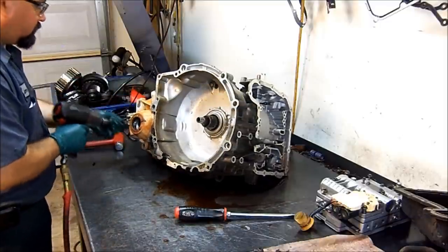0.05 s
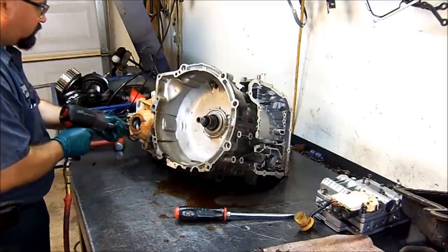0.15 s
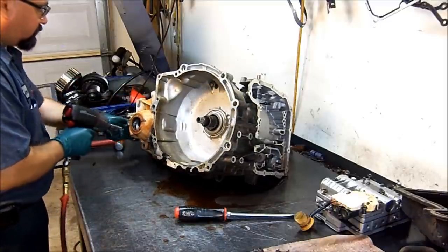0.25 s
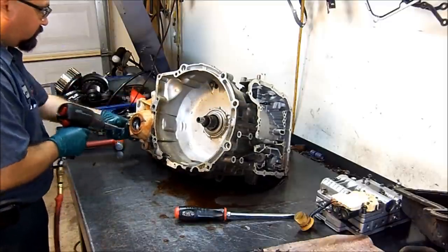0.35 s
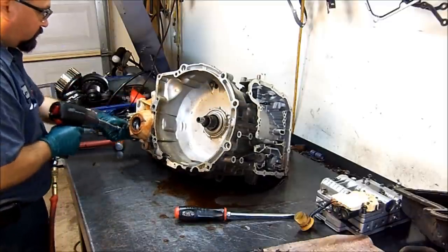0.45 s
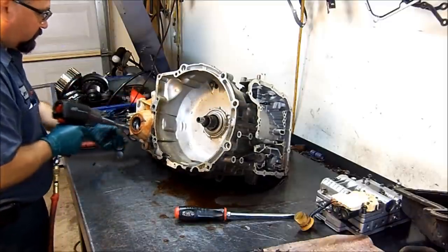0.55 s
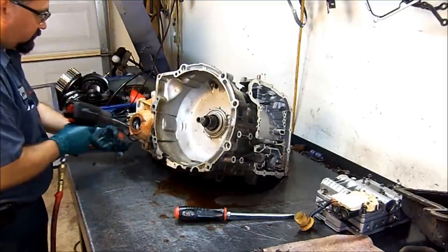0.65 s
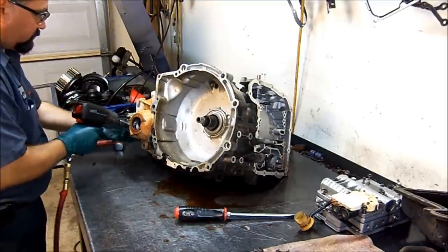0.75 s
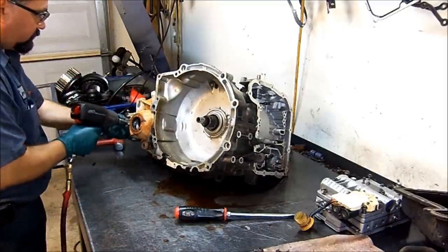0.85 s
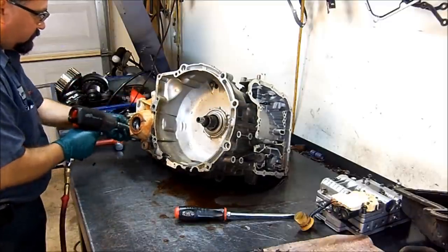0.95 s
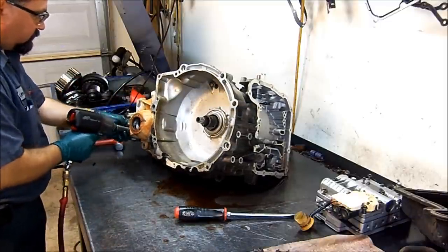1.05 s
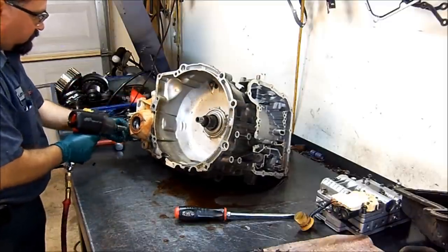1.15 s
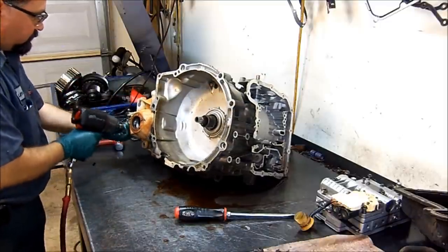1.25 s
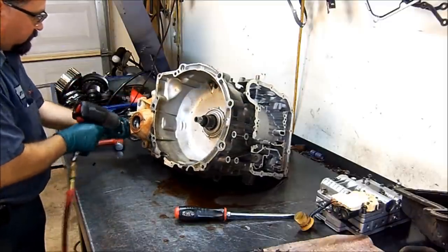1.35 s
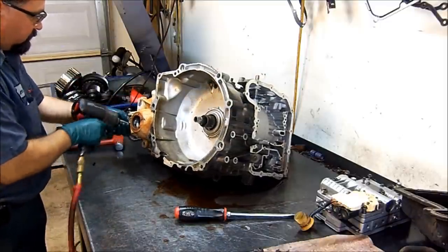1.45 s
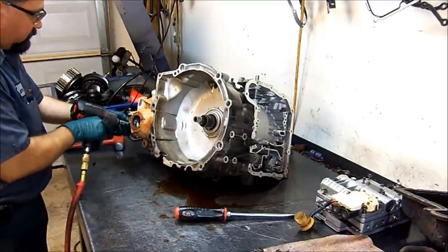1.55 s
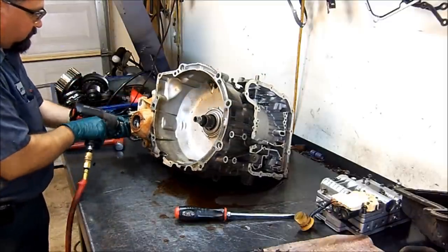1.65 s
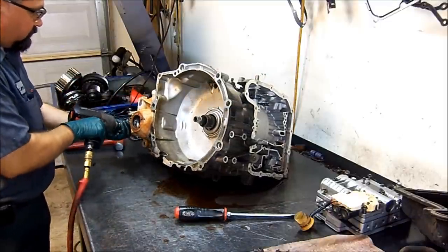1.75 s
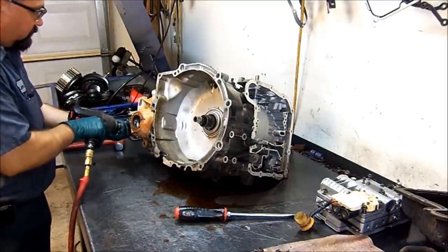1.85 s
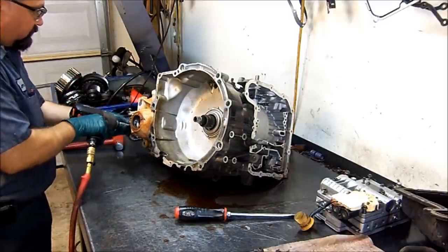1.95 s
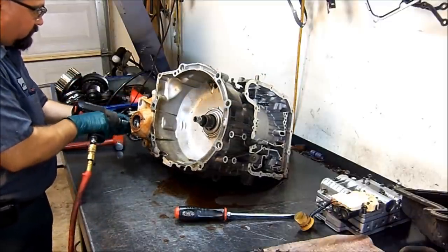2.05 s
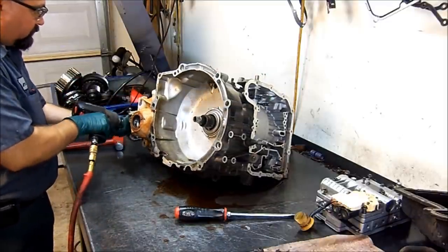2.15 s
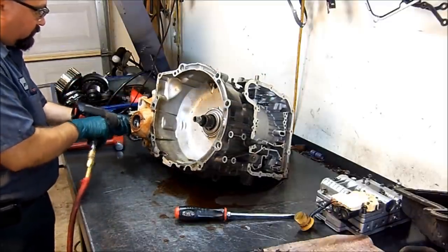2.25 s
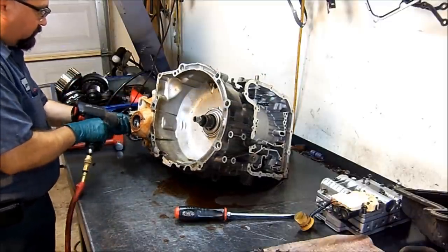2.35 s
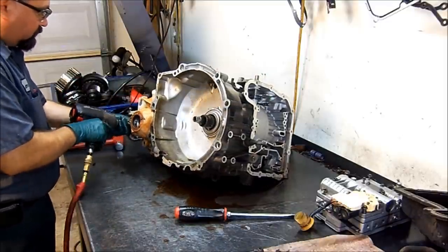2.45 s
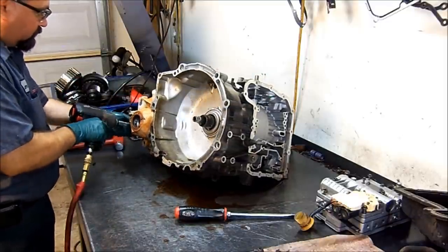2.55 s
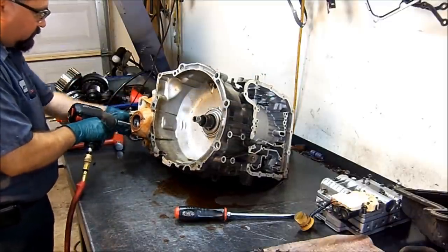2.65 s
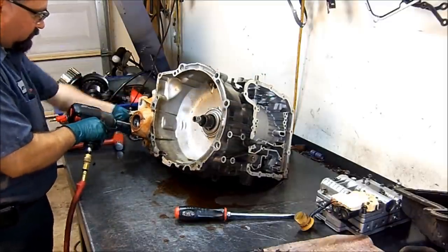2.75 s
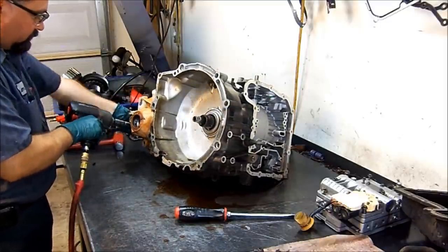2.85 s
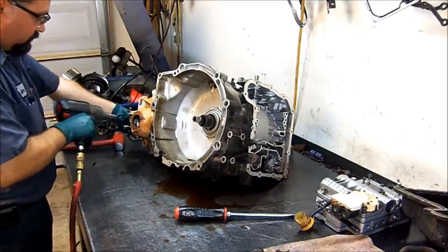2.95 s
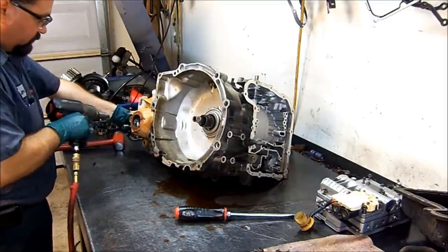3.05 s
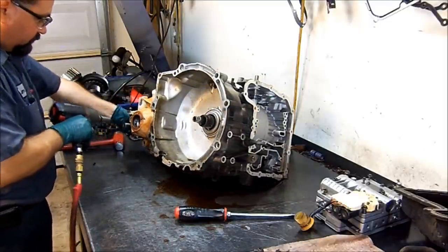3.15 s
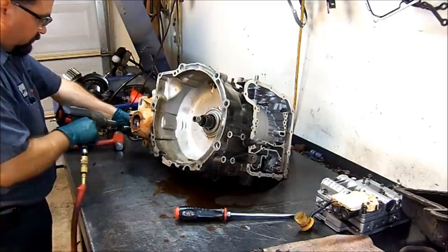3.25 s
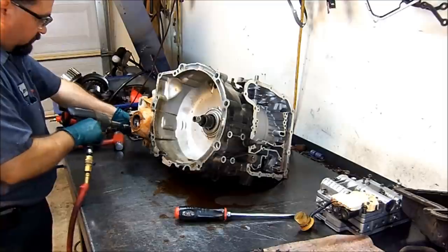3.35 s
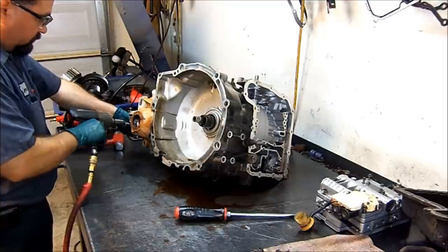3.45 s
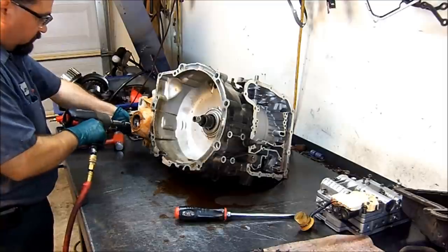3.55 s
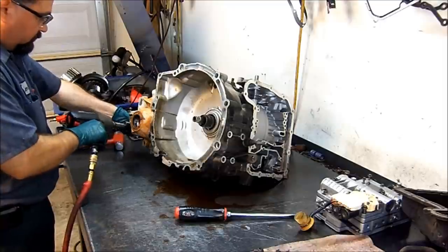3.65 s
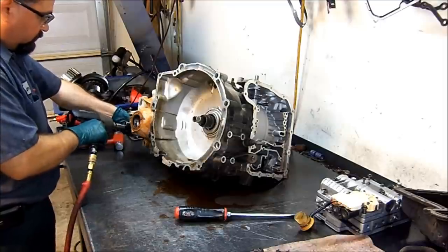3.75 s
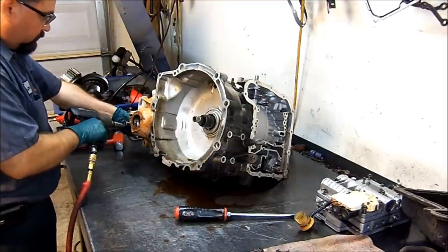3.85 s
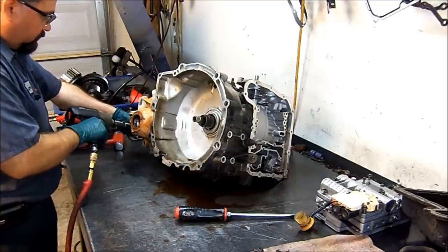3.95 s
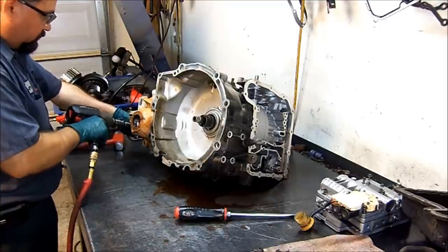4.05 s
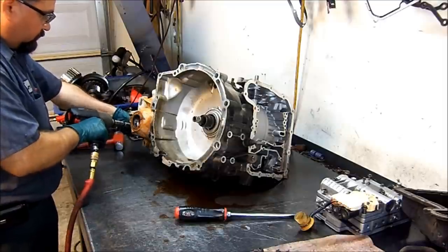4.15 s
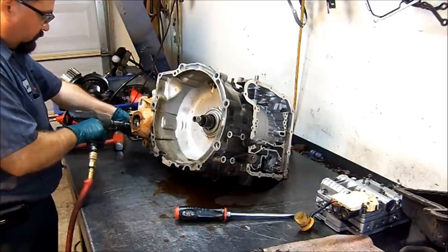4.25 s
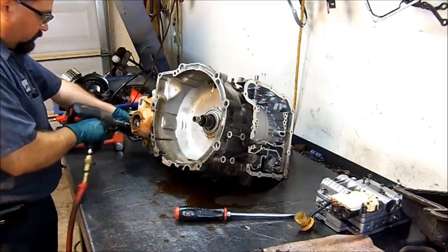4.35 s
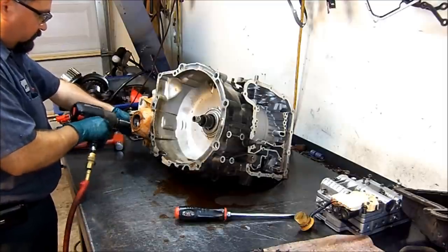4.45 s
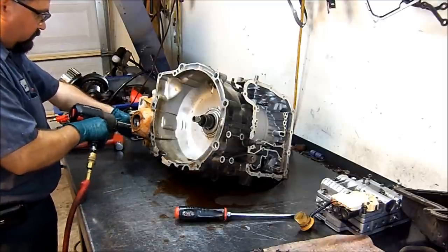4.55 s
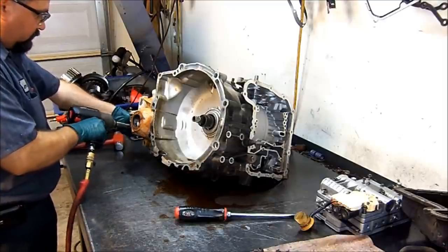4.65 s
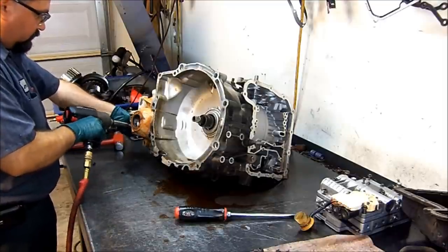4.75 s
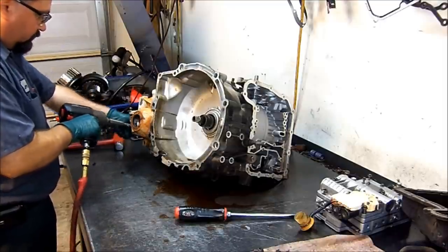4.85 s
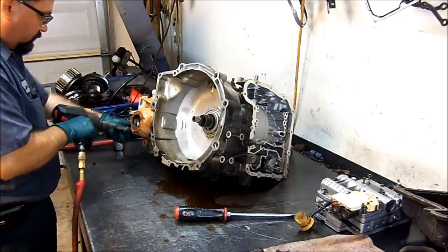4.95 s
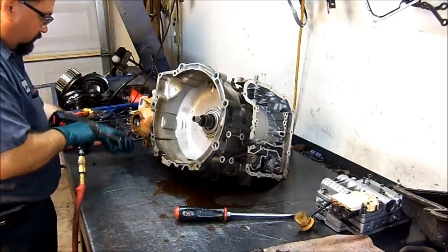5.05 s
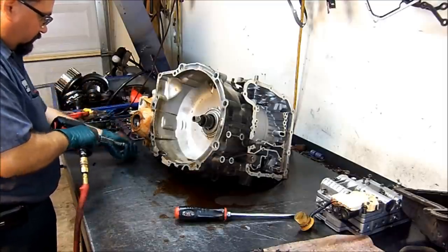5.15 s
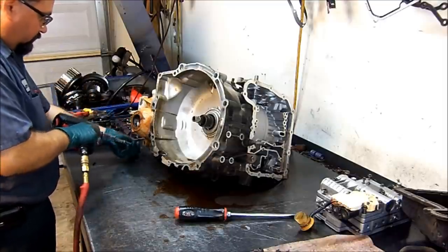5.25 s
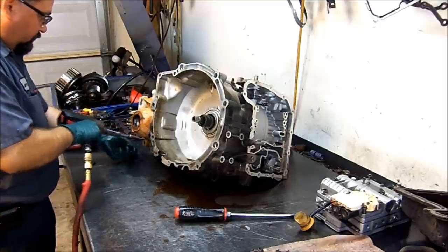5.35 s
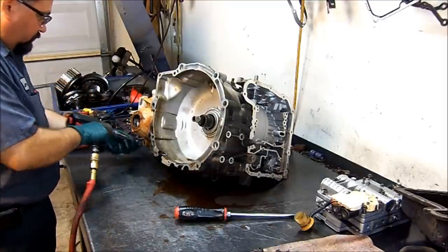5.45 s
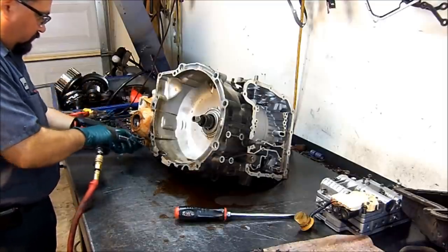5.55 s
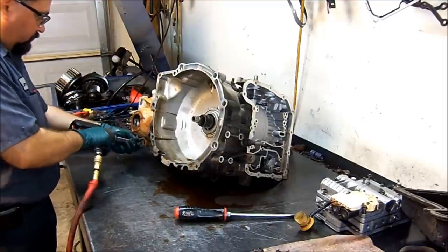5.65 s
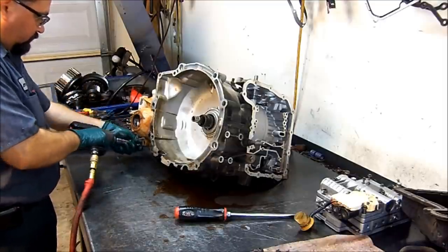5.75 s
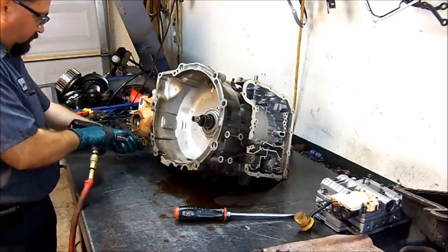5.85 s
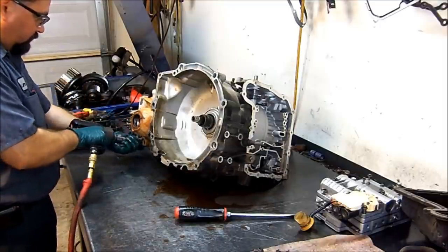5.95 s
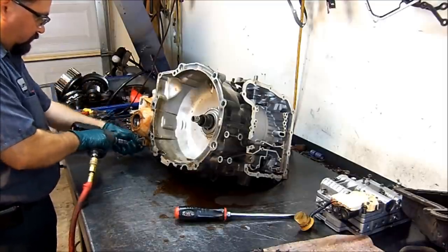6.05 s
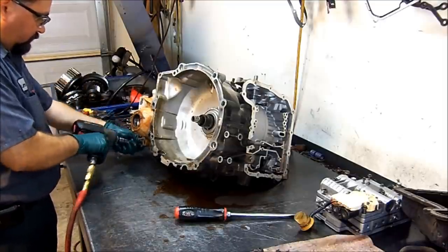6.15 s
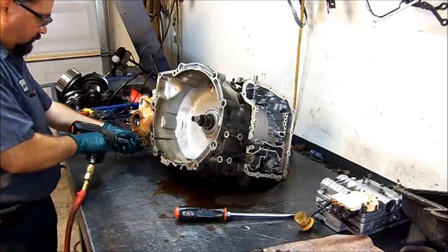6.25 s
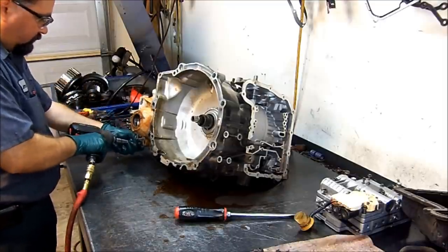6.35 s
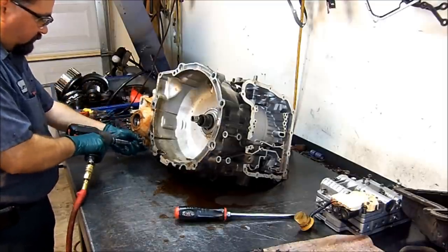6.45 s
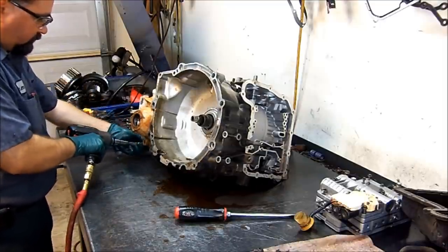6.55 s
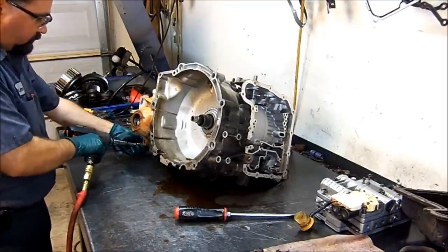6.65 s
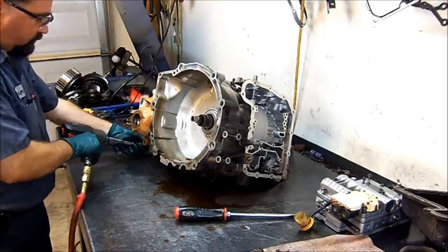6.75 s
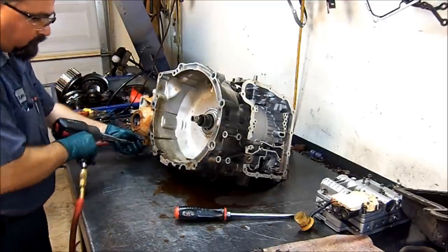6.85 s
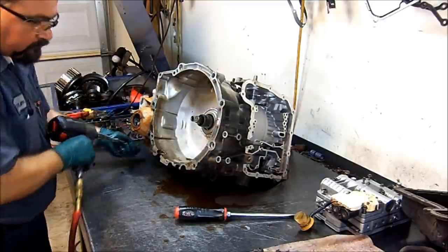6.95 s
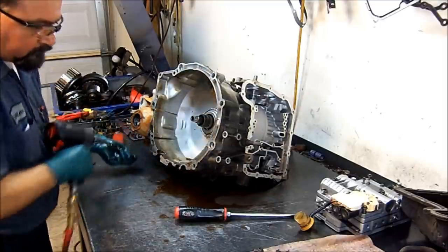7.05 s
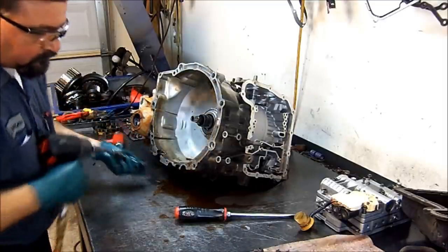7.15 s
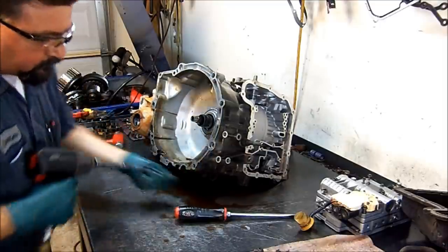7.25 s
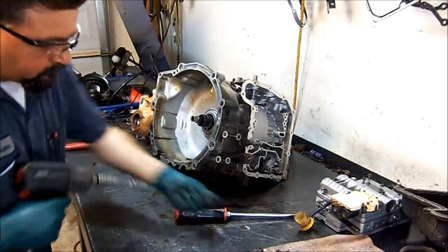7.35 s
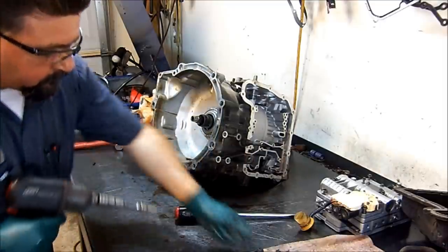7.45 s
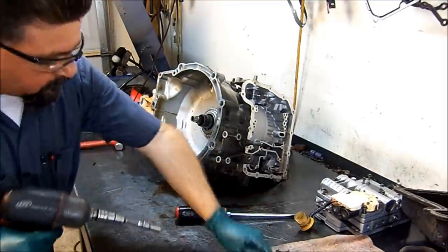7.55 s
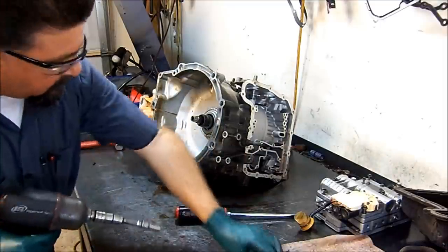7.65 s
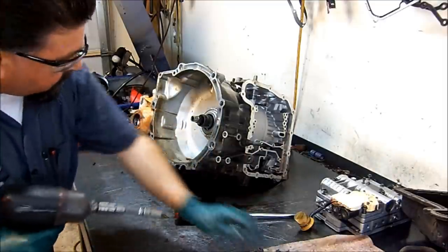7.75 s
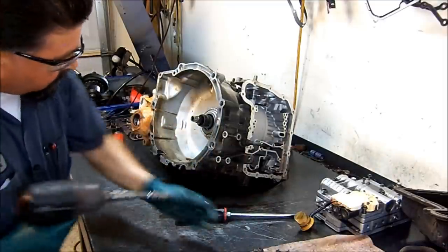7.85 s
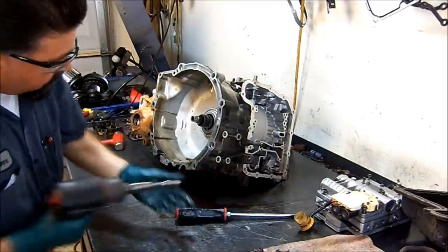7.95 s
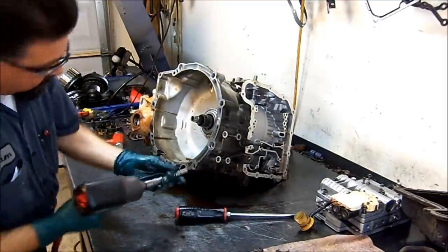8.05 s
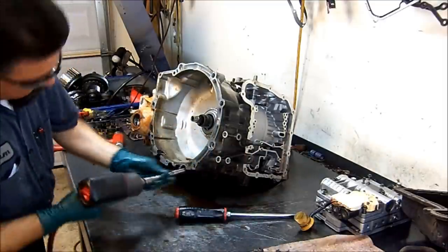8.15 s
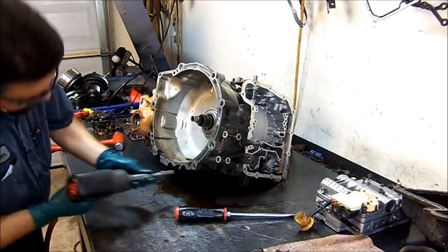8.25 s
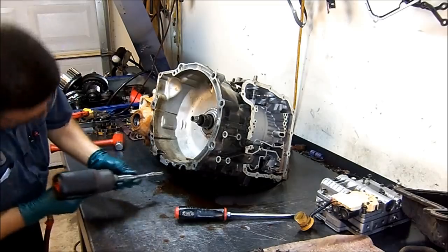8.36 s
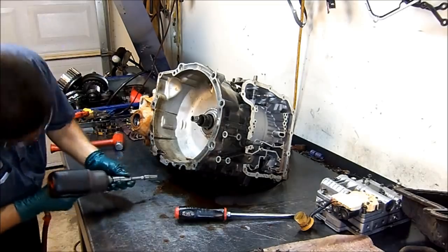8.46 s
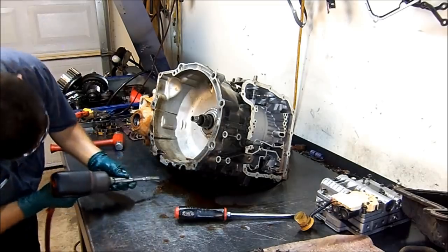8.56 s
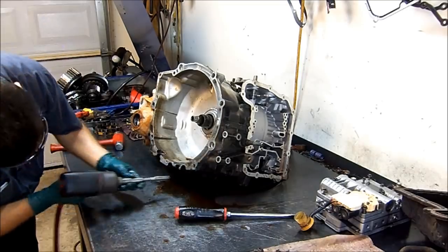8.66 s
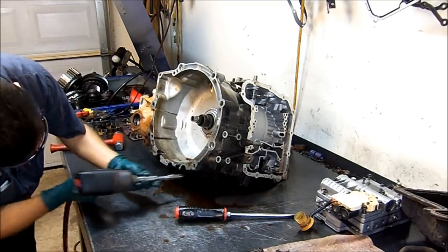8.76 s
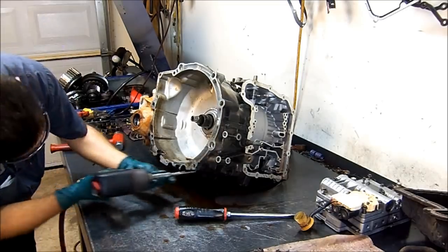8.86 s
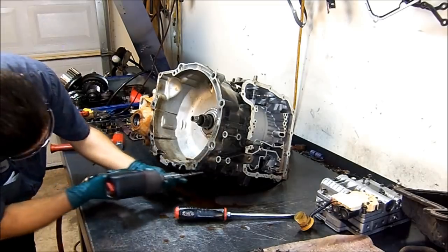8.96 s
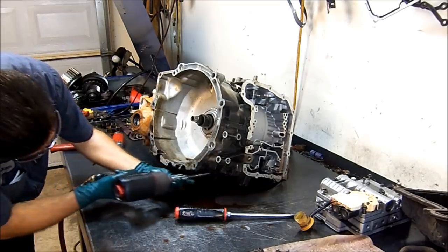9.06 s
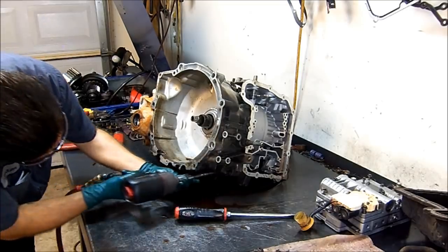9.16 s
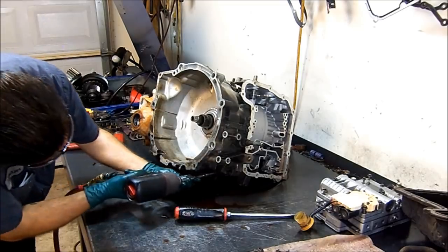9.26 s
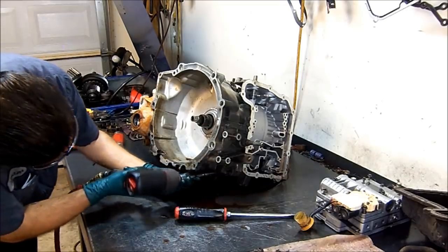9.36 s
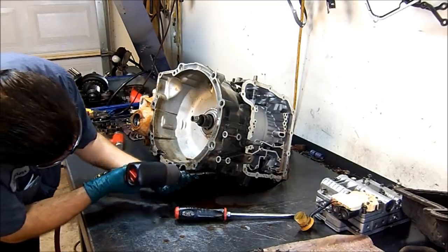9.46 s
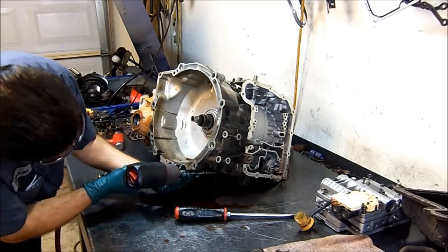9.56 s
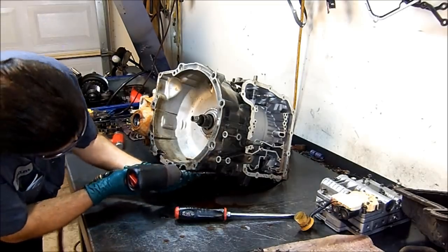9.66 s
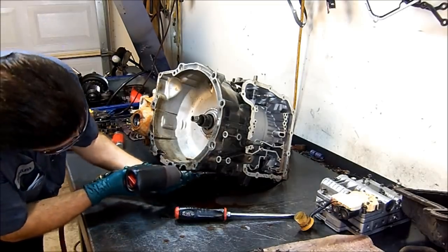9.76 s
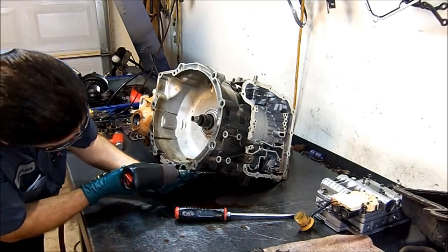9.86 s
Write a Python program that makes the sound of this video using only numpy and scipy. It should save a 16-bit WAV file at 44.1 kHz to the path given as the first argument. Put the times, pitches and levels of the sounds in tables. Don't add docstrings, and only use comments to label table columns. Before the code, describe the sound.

A pneumatic impact wrench is triggered four times near the microphone, each blip a split-second air hiss bursting into a buzzing metallic hammering, then whirring down. Between bursts a socket and bolts click, knock and ring brightly, gloves and hose rustle, and metal drags briefly on a steel bench. Short hard echoes surround everything. The first and last bursts are loudest; a dim rumble and wavering motor hum stay far behind.

```python
import sys
import numpy as np
from scipy import signal
from scipy.fft import rfft, irfft, next_fast_len
from scipy.io import wavfile
from scipy.ndimage import uniform_filter1d

SR = 44100
rng = np.random.default_rng(int(sys.argv[2]) if len(sys.argv) > 2 else 0)


def gain_from_db(level_db):
    decades = np.asarray(level_db, float) / 20
    return 10 ** decades


def store_pcm(level_fs):
    pcm = np.round(np.clip(level_fs, -1, 1) * 32767).astype(np.int16)
    wavfile.write(sys.argv[1], SR, np.atleast_2d(pcm).T)


N = 436588

# time_s, rumble_db, rustle_db, rustle_treble_db
BACKGROUND_LEVELS = [
    [(0.0, -68, -67.5, -68), (0.45, -66, -86, -81.5), (1.98, -71, -84.5, -82), (2.21, -54, -74.5, -75.5),
     (2.48, -48.5, -37.5, -42.5), (3.16, -56.5, -66, -68), (4.44, -54, -71, -70.5),
     (4.6, -52.5, -41, -38.5), (5.01, -55, -55.5, -56.5), (5.44, -54, -66, -72.5),
     (5.75, -55.5, -60, -53.5), (5.93, -55.5, -72, -71), (6.23, -54.5, -73, -71.5), (6.36, -55.5, -44, -44),
     (7.29, -62, -78.5, -77.5), (8.1, -58.5, -72.5, -78.5)],
    [(9.0, -59, -70, -81), (9.234, -51.5, -66, -68), (9.79, -49.5, -52.5, -49), (9.9, -65, -24, -24.5)],
]
# time_s, rumble_db, rustle_db, rustle_treble_db
LULL_LEVELS = [(8.38, -60, -75, -77), (8.85, -61, -75, -77)]
# frequency_hz, density_db
RUMBLE_SPECTRUM = [(8.8, -29.5), (15, 0), (39, -1), (140, -11.5), (270, -17), (618, -29), (779, -29),
                   (1500, -38.5), (1950, -65.5), (3300, -120)]
# frequency_hz, density_db
RUSTLE_SPECTRUM = [(180, -33.5), (300, -7), (975, -2.5), (1210, -4.5), (2250, -8), (11500, -26.5),
                   (13200, -21.5), (14300, -38), (15000, -36.5)]
# time_s, pitch_hz, level_db, overtones_db
DRONE_COURSE = [(0, 151, -84, -7), (2.4, 150.3, -79.5, 1), (3.5, 153, -58, 2), (4.3, 148.5, -54.5, -4),
                (5.201, 147.1, -54, 0.5), (5.9, 147.6, -49, -4), (6.702, 144.4, -55.5, -2.5),
                (7.299, 140.7, -69, -0.5), (7.9, 140.9, -55, -7), (8.499, 140.4, -70.5, 10),
                (9.198, 138, -59.5, 6.5), (9.9, 138.1, -48.5, 13)]
# multiple, level_db
DRONE_ORDERS = [(1, -2.5), (2, -14.5), (3, -19.5), (4, -25)]
# start_s, peak_db, ring_hz, low_db, middle_db, high_db
METAL_TAPS = [(0.0094, -49, 2860, -67, -53, -59), (0.1728, -45, 6800, -69, -57, -55.5),
              (0.3194, -55, 9160, -86, -69, -63), (0.3647, -50, 2100, -74, -57, -68.5),
              (0.4708, -59, 3560, -75, -62, -71.5), (0.5894, -62, 3080, -82, -72, -78.5),
              (0.832, -55, 2750, -75, -57.5, -69), (0.8823, -34, 3300, -53.5, -40.5, -48),
              (0.8866, -30, 2030, -44.5, -50, -39), (1.1905, -54, 3030, -80, -59, -56),
              (1.314, -59, 3600, -76, -67, -63), (1.4321, -35, 11600, -81, -58, -54.5),
              (1.5467, -55, 2340, -68, -59.5, -63.5), (1.62, -59, 1210, -70, -64.5, -69),
              (2.0207, -61, 2660, -64.5, -65, -71), (2.141, -39, 2690, -46.5, -46.5, -47),
              (2.2497, -29, 11800, -70, -53, -45), (2.3158, -14, 6700, -33.5, -24.5, -21.5),
              (2.717, -31, 1030, -45, -53, -53), (2.8125, -35, 1330, -48, -51, -57),
              (2.896, -40, 3730, -51, -42, -47.5), (2.9575, -37, 830, -45, -39.5, -37),
              (3.0708, -39, 1760, -50.5, -41.5, -43), (3.1734, -42, 2100, -50.5, -50.5, -53.5),
              (3.2534, -47, 1244, -59, -56.5, -67), (3.3209, -34.5, 7660, -50, -41.5, -38.5),
              (3.5236, -13.5, 7450, -71, -49, -38), (3.5304, -36, 7390, -53, -39, -33),
              (3.5472, -23.5, 1380, -39, -36.5, -40), (3.7778, -32, 6070, -68, -53, -42.5),
              (3.7895, -34, 3180, -47.5, -35, -32.5), (3.8025, -19.5, 1190, -37.5, -33.5, -30),
              (3.8597, -33, 1730, -47, -38.5, -33.5), (4.0372, -58, 2680, -56, -51.5, -57),
              (4.0986, -33, 1720, -52.5, -52.5, -58), (4.1774, -37, 1280, -57, -55.5, -59.5),
              (4.1975, -37, 1280, -48.5, -43.5, -49), (5.1566, -40, 2040, -51, -45, -43),
              (5.214, -40, 940, -57, -47, -44.5), (5.2333, -42, 870, -41.5, -41.5, -46),
              (5.2532, -39, 11700, -42, -54.5, -47), (5.3742, -49, 1000, -60, -56, -57.5),
              (5.4106, -38, 7730, -58, -51, -50.5), (5.5504, -32, 3340, -62, -43.5, -42.5),
              (5.5678, -26, 11200, -55, -47, -40), (5.615, -27, 11600, -71, -54, -42.5),
              (5.6613, -16, 2720, -34.5, -37, -35), (5.6663, -27.5, 2750, -40, -25.5, -26),
              (5.672, -11, 1200, -33, -30, -30), (5.8481, -33, 2210, -49, -54, -57.5),
              (5.879, -42.5, 2730, -59.5, -53, -63), (5.9936, -54, 1250, -64, -62, -62.5),
              (6.619, -39.5, 980, -53.5, -48, -66), (6.6699, -39, 2680, -63, -49, -44.5),
              (6.7028, -39, 5970, -63, -66, -61), (6.7218, -26, 6260, -54.5, -53, -45),
              (6.7794, -44, 1020, -60, -50, -63), (6.8224, -29, 6200, -61, -44.5, -42.5),
              (6.8544, -41.5, 865, -63, -55, -47), (6.9815, -47, 11500, -65, -68, -59),
              (7.0212, -50, 1700, -66, -58, -70), (7.094, -47, 2850, -61, -62.5, -71),
              (7.1076, -41, 7860, -64.5, -55.5, -51), (7.195, -41, 2920, -61, -50, -51),
              (7.3197, -47.5, 1240, -67, -54, -54), (7.728, -50, 1040, -46, -69, -81),
              (7.7899, -41, 890, -42.5, -52.5, -66.5), (7.8532, -26.5, 11500, -43.5, -64.5, -49),
              (8.1329, -52.5, 6280, -64, -60, -44), (8.158, -34.5, 12260, -61, -50.5, -44),
              (8.892, -43.5, 3160, -61, -43.5, -55.5), (8.9315, -33, 900, -56.5, -49, -56),
              (8.972, -30.5, 890, -59, -65, -69), (9.3004, -19, 940, -36.5, -34, -39),
              (9.3115, -13.5, 6380, -29.5, -22.5, -22), (9.5523, -23.5, 3230, -48, -44, -52),
              (9.5829, -15, 7840, -45.5, -34.5, -24), (9.6205, -20, 7010, -53, -55, -38)]
# start_s, peak_db, ring_hz, low_db, middle_db, high_db
HAMMER_BLOWS = [(2.356, 5, 1775, -27, -11.5, -15), (2.3708, 1, 2275, -32, -17.5, -8.5),
                (2.3897, 2, 1765, -20, -10.5, -10.5), (2.4432, -4.5, 1936, -23.5, -16.5, -10.5),
                (4.4396, -6.5, 1800, -33, -19.5, -20), (4.4541, -3, 1773, -35, -20, -12),
                (4.4611, -5.5, 1796, -32, -21, -15), (4.4779, -1.5, 2221, -32, -16, -12),
                (4.5024, -1.5, 2110, -28, -18, -14), (4.5137, -7.5, 1674, -24, -17.5, -14.5),
                (4.5364, -6, 8220, -28, -16.5, -9.5), (6.2243, -4, 1775, -38, -16, -15.5),
                (6.2417, 4, 6390, -24, -12.5, -7.5), (6.2624, -1, 2150, -26.5, -17, -14.5),
                (6.281, 1, 3776, -30, -16.5, -13.5), (6.326, -9.5, 2825, -25, -20, -8.5),
                (9.7631, -5, 7600, -23.5, -12.5, -5.5), (9.7991, 2, 2180, -16, -7.5, -9),
                (9.8292, 3.5, 2060, -16, -11.5, -5)]
# frequency_hz, width_hz
RING_WIDTHS = [(800, 400), (3000, 750), (7400, 800), (12000, 1300)]
# frequency_hz, t60_s
SHOP_DECAY = [(250, 0.31), (700, 0.26), (1800, 0.38), (4600, .38), (12000, 0.1)]
# start_s, peak_db
SOCKET_RINGS = [(1.4331, -52), (2.249, -45), (2.3161, -43), (5.2525, -53), (5.3717, -63.5), (5.4375, -62.5),
                (5.5692, -36), (5.6143, -39), (6.5194, -46), (6.6679, -62), (6.7037, -58), (6.721, -46),
                (6.8518, -53), (6.9814, -54), (7.7752, -68), (7.8508, -38.5)]
# frequency_hz, level_db, t60_s
SOCKET_MODES = [(11600, 0, .3), (11730, -3, .22), (11450, -5, .15)]
# start_s, length_s, level_db, lowest_hz, highest_hz
BENCH_SCRAPES = [
    (2.139, 0.16, -60.5, 202, 696),
    (5.2, .13, -57.5, 200, 1500),
    (6.66, 0.19, -57, 4500, 7900),
    (7.439, 0.16, -73.5, 2500, 6010),
    (7.725, 0.22, -57, 202, 1220),
    (8.173, .19, -68.5, 1200, 9200),
    (8.886, 0.16, -60.5, 800, 3900),
]
# time_s, rattle_db, low_relative_db, hiss_relative_db
WRENCH_BURSTS = [
    [(2.314, -48, -16.5, -4.5), (2.33, -41, -2.5, 11), (2.357, -16, -13.5, -3)],
    [(2.357, -15, -16, -3.5), (2.367, -15, -9.5, -1), (2.415, -11, -7.5, 0.5), (2.635, -41.5, -5, -3),
     (2.863, -67, 5, -8), (2.9, -42, -12, -0.5)],
    [(4.397, -51.5, 7, 8.5), (4.413, -43.5, -2.5, 14.5), (4.437, -28, -2, 0)],
    [(4.437, -25, -8.5, 2.5), (4.469, -22, 3.5, -2.5), (4.491, -20.5, -17.5, 3), (4.647, -47.5, -7, 2.5),
     (4.861, -45.5, -4.5, 3.5), (5.0, -69.5, -2, -1)],
    [(6.184, -48.5, 5, 12.5), (6.204, -38, -11, 3), (6.214, -33, -5, 1)],
    [(6.214, -31, -3.5, 2), (6.23, -18.5, -5.5, 0.5), (6.324, -20.5, -12, 1), (6.39, -38.5, -2, 4.5),
     (6.594, -59.5, -2, -1), (6.856, -61, -24, 1), (6.9, -70, -8, -8)],
    [(9.73, -79, 6, 0), (9.736, -34, -2.5, 8.5), (9.764, -15.5, -9, -1.5)],
    [(9.764, -10.5, -12.5, -0.5), (9.808, -8, -13.5, 1), (9.9, -14.5, -10.5, -1)],
]
# time_s, pulse_rate_hz, clean_tone_db
VANE_COURSE = [(2.309, 202.6, -72), (2.37, 326.6, -39), (2.452, 373.7, -42), (2.6, 292.4, -54.5),
               (2.901, 199.5, -73), (4.391, 197, -71.5), (4.46, 332.9, -40), (4.539, 396, -35),
               (4.619, 335, -40), (4.702, 288, -45), (4.8, 223.3, -49.5), (4.9, 181, -67),
               (5.0, 131.6, -80), (6.18, 201.7, -69), (6.23, 271.2, -44.5), (6.271, 346.6, -26.5),
               (6.342, 330, -39), (6.501, 250, -67), (6.9, 146, -82), (9.722, 198.2, -65),
               (9.781, 323, -26), (9.9, 340, -43)]
# frequency_hz, width_hz, level_db
HOUSING_MODES = [(1770, 90, 0), (2080, 180, 2), (2830, 200, -1), (3600, 250, -3), (4500, 300, -4)]
# frequency_hz, width_hz, level_db
VALVE_WHISTLES = [(7230, 450, 10), (10100, 370, -1.5), (11700, 1200, 3.5), (13300, 990, -1)]
# frequency_hz, density_db
RATTLE_SPECTRUM = [(35, -47), (60, -10.5), (182, -9.5), (339, 0), (526, -9.5), (1600, -1), (1750, -11),
                   (1880, -3), (2060, -12.5), (2420, -2.5), (11100, 0), (14000, -10), (15000, -59.5)]
# frequency_hz, level_db
TREBLE_LIMIT = [(13900, 1), (14200, -33.5), (15200, -35.5)]


def evened(x):
    return x / np.sqrt(np.mean(x ** 2) + 1e-20)


def read(points, hz):
    f, value = np.transpose(points)
    return np.interp(np.log(hz + 1), np.log(f + 1), value)


def add(mix, start_s, sound):
    part = mix[..., round(start_s * SR):][..., :sound.shape[-1]]
    part += sound[..., :part.shape[-1]]


def filtered(x, points):
    size = next_fast_len(x.shape[-1])
    gain = gain_from_db(read(points, np.fft.rfftfreq(size, 1 / SR)))
    return irfft(rfft(x, size) * gain, size)[..., :x.shape[-1]]


def coloured(x, points):
    return evened(filtered(x, points))


def band(x, lo_hz, hi_hz, order=3):
    edges_hz = [lo_hz, min(hi_hz, 0.45 * SR)]
    sos = signal.butter(order, edges_hz, "band", fs=SR, output="sos")
    return evened(signal.sosfilt(sos, x))


def resonances(x, modes):
    total = np.zeros(len(x))
    for hz, width_hz, db in modes:
        total += gain_from_db(db) * signal.lfilter(*signal.iirpeak(hz, hz / width_hz, SR), x)
    return evened(total)


def smooth_wander(x, width):
    return evened(uniform_filter1d(uniform_filter1d(x, width), width))


def background():
    time_s, *columns = np.transpose(np.vstack([BACKGROUND_LEVELS[0], LULL_LEVELS, BACKGROUND_LEVELS[1]]))
    t = np.arange(N) / SR
    rumble_db, rustle_db, treble_db = (np.interp(t, time_s, c) for c in columns)
    rumble_noise, rustle_noise, lumps, chance = rng.standard_normal((N, 4)).T
    lumps_db = 2.2 * smooth_wander(lumps, 1500)
    rumble = gain_from_db(rumble_db + lumps_db) * coloured(rumble_noise, RUMBLE_SPECTRUM)
    ticks = signal.lfilter([1], [1, -0.995], 0.7 * (chance > 3.3) * abs(chance * 0 + rumble_noise))
    rustle = coloured(rustle_noise * (1 + ticks), RUSTLE_SPECTRUM)
    body = gain_from_db(rustle_db) * band(rustle, 300, 4500)
    treble = gain_from_db(treble_db) * band(rustle, 4500, 15000)
    return rumble + body + treble


def drone():
    time_s, pitch_hz, level_db, overtones_db = np.transpose(DRONE_COURSE)
    t = np.arange(N) / SR
    wobble_hz = 40 * uniform_filter1d(rng.standard_normal(N), 3000)
    turns = np.cumsum(np.interp(t, time_s, pitch_hz) + wobble_hz) / SR
    out = np.zeros(N)
    for k, order_db in DRONE_ORDERS:
        waver_db = 2.5 * smooth_wander(rng.standard_normal(N), 3000)
        extra_db = (k > 1) * np.interp(t, time_s, overtones_db)
        out += gain_from_db(order_db + waver_db + extra_db) * np.sin(2 * np.pi * k * turns)
    return np.sqrt(2) * gain_from_db(np.interp(t, time_s, level_db)) * out


def knock(row, ring_db, crack_db, t60_s, rise_s):
    start_s, peak_db, ring_hz, low_db, middle_db, high_db = row
    t = np.arange(round(0.15 * SR)) / SR
    half_hz = read(RING_WIDTHS, ring_hz) / 2
    # level_db, lowest_hz, highest_hz, slowness
    parts = [(low_db, 220, 900, 3.5),
             (middle_db, 1100, 4600, 1.6),
             (high_db, 5400, 11500, 1),
             (peak_db + ring_db, ring_hz - half_hz, ring_hz + half_hz, 1.3)]
    crack, click = out = np.zeros((2, len(t)))
    for db, lo_hz, hi_hz, slower in parts:
        decay = gain_from_db(db + crack_db - 60 * t / (slower * t60_s))
        shape = decay * (1 - np.exp(-t / (slower * rise_s)))
        crack += shape * band(rng.standard_normal(len(t)), lo_hz, hi_hz, order=2)
        impulse = 1.0 * (t == 0)
        click += np.sqrt(np.mean(shape ** 2)) * band(impulse, lo_hz, hi_hz, order=2)
    return start_s, out


def shop(x):
    out = np.zeros(N)
    turn = np.pi * np.arange(N) / SR * 7.0
    slots = np.arange(200, SR - 20, 20)
    for k in range(3):
        taps = np.zeros(SR)
        taps[slots + rng.integers(0, 20, len(slots))] = rng.choice([-1.0, 1.0], len(slots))
        hz, t, z = signal.stft(taps, SR, nperseg=256)
        decay = gain_from_db(-60 * t / read(SHOP_DECAY, hz)[:, None])
        tail = signal.istft(z * decay, SR, nperseg=256)[1]
        share = np.sqrt(2 / 3) * np.cos(turn + k * np.pi / 3)
        out += signal.fftconvolve(x * share, tail / np.linalg.norm(tail))[:N]
    return out


def socket(row):
    start_s, peak_db = row
    t = np.arange(round(0.4 * SR)) / SR
    ring = np.zeros(len(t))
    for hz, db, t60_s in SOCKET_MODES:
        phase = 2 * np.pi * rng.random()
        ring += gain_from_db(db - 60 * t / t60_s) * np.sin(2 * np.pi * hz * t + phase)
    return start_s, gain_from_db(peak_db - 6.5) * ring * np.minimum(t / 0.0008, 1)


def scrape(row):
    start_s, length_s, db, lo_hz, hi_hz = row
    u = np.arange(round(length_s * SR)) / (length_s * SR)
    noise, slips = rng.standard_normal((len(u), 2)).T
    grains = signal.lfilter([1], [1, -0.99], (slips > 2.6) * noise) + 0.25
    stroke = np.minimum(u / 0.089, 1) * np.sqrt(1 - u)
    return start_s, gain_from_db(db) * stroke * band(grains * noise[::-1], lo_hz, hi_hz, order=2)


def wrench_burst(rows):
    time_s, *columns = np.transpose(rows)
    t = np.arange(time_s[0], time_s[-1], 1 / SR)
    rattle_db, low_db, hiss_db = (np.interp(t, time_s, c) for c in columns)
    vane_s, rate_hz, tone_db = np.transpose(VANE_COURSE)
    rattle_noise, low_noise, air_noise, wobble = rng.standard_normal((len(t), 4)).T
    unsteady = 1 + 0.089 * uniform_filter1d(wobble, 200)
    turns = np.cumsum(np.interp(t, vane_s, rate_hz) * unsteady) / SR
    strength = gain_from_db(3.0 * rng.standard_normal(400))[turns.astype(int) % 400]
    puffs = 0.55 + strength * np.exp(-(turns % 1) / 0.27)
    shaken = coloured(puffs * rattle_noise, RATTLE_SPECTRUM)
    rattle = band(shaken + 0.57 * resonances(shaken, HOUSING_MODES), 890, 4900)
    low = band(coloured(puffs * low_noise, RATTLE_SPECTRUM), 60, 650)
    whistle = np.clip(0.3 + hiss_db / 9, 0.2, 2) * resonances(air_noise, VALVE_WHISTLES)
    hiss = band(coloured(puffs * air_noise, RATTLE_SPECTRUM) + whistle, 5200, 15000)
    noise = gain_from_db(rattle_db - 3.5) * (rattle + gain_from_db(low_db) * low + gain_from_db(hiss_db) * hiss)
    tone = np.sin(2 * np.pi * turns) + 0.14 * np.sin(4 * np.pi * turns)
    tone *= gain_from_db(np.interp(t, vane_s, tone_db))
    fades = np.minimum(np.minimum(t - time_s[0], time_s[-1] - t) / 0.0007, 1)
    return time_s[0], (noise + tone) * fades


def scene():
    motor = np.zeros(N)
    blows, metal = np.zeros((2, 2, N))
    for row in METAL_TAPS:
        add(metal, *knock(row, ring_db=-14.0, crack_db=2, t60_s=0.023, rise_s=0.0012))
    for row in SOCKET_RINGS:
        add(metal, *socket(row))
    for row in BENCH_SCRAPES:
        add(metal, *scrape(row))
    for rows in WRENCH_BURSTS:
        add(motor, *wrench_burst(rows))
    for row in HAMMER_BLOWS:
        add(blows, *knock(row, ring_db=-18, crack_db=0.0, t60_s=0.031, rise_s=0.00046))
    echoes = shop(gain_from_db(-9.5) * motor + gain_from_db(-4.5) * blows[1] + gain_from_db(-2.0) * metal[1])
    return (motor + blows[0] + metal[0] + echoes + drone() + background())[None]


def low_pass(x):
    return signal.sosfilt(signal.butter(12, 15230, fs=SR, output="sos"), x)


def record(dry):
    ceiling = 0.86
    overloaded = ceiling * np.tanh(dry / ceiling)
    limited = filtered(overloaded, TREBLE_LIMIT)
    return low_pass(limited)


dry = scene()
out = record(dry)
store_pcm(out)
```